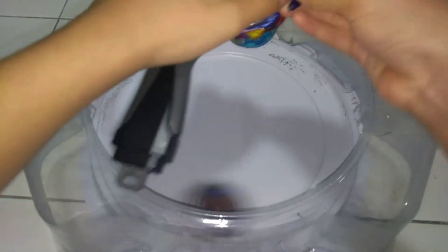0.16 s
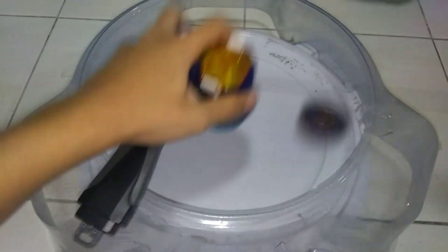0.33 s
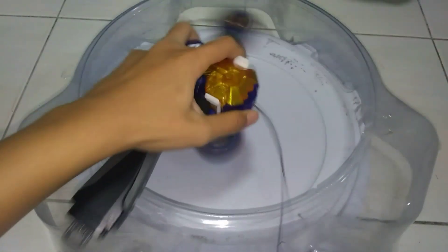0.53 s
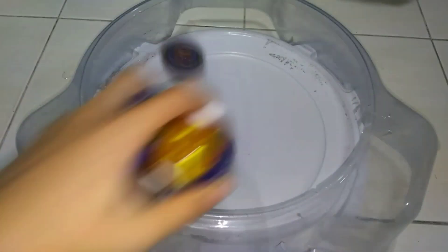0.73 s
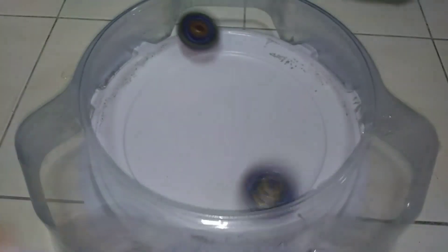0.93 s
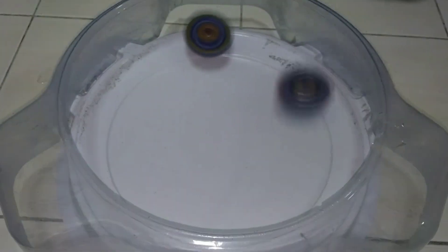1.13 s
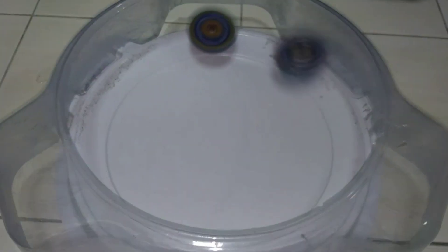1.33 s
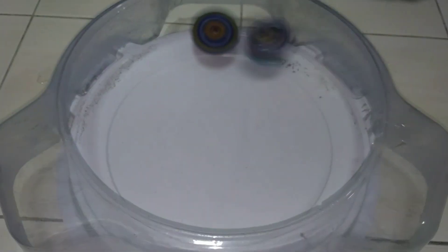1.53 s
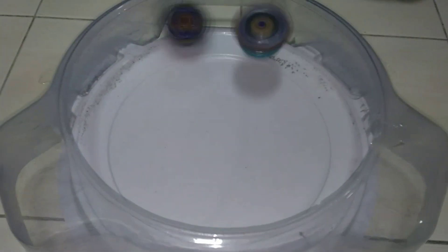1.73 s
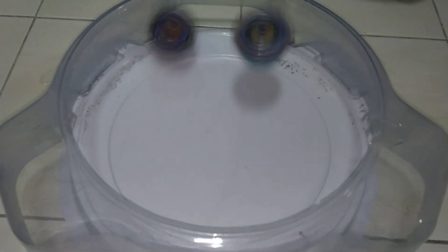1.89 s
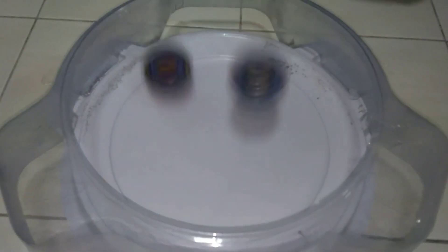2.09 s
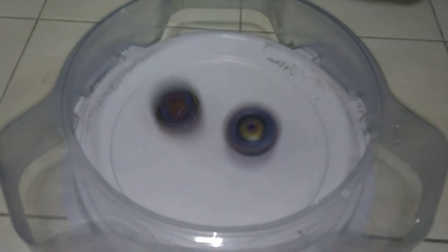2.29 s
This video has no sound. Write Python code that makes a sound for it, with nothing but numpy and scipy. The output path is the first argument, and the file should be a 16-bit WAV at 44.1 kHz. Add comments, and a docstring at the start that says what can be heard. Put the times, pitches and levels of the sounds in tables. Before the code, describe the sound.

Spinning toy tops clack and rattle in a plastic bowl. First come close launcher knocks and a quick whistling, rasping cord pull, then a dense run of sharp knocks, then duller clashes, in a tiled room with low microphone rumble.

```python
"""Plastic knocks and a whistling zip: a cord launcher is gripped, pulled and knocked about up close,
then two spinning tops clash and rattle in a plastic bowl. Each knock is a short chatter of contacts
that shakes hard rims, a hollow shell and the bowl's floor, with a bright metallic tick until the
treble shuts off midway. A tiled room answers, a low rumble comes and goes and the loudest blows clip."""
import sys
import numpy as np
from scipy import signal
from scipy.fft import rfft, irfft, next_fast_len
from scipy.io import wavfile
from scipy.ndimage import uniform_filter1d, map_coordinates

SR = 44100
rng = np.random.default_rng(int(sys.argv[2]) if len(sys.argv) > 2 else 0)


def pcm_store(signal):
    """Save signal as 16-bit PCM."""
    levels = np.round(np.clip(np.atleast_2d(signal), -1, 1) * 32767)
    wavfile.write(sys.argv[1], SR, levels.astype(np.int16).T)


N = 103635
CONTACT_ATTACK_S = .0004


def knocks():
    """Blows shake the plastic and the bowl, with a bright metallic tick until the treble shuts off."""
    # launcher and landing top: start_s, clack_db, bump_db, thud_db, tick_db, chatter_s, decay_stretch
    handling = [(0.001, -41, -29, -32, -74, 0.018, 1.57), (0.162, -51, -20.5, -38, -46, 0.015, 1.2),
                (0.177, -56, -33, -24.5, -32.5, 0.0053, 1.44),
                (0.215, -16, -26.5, -23.5, -20.5, 0.013, 1.7),
                (0.227, -12, -25.5, -12.5, -18.5, 0.0075, 1.75),
                (0.464, -26, -11.5, -17, -37, 0.0087, 0.78), (0.4995, -19, -31.5, -41.5, 3, 0.0018, 0.7),
                (0.513, -10, -25, -30, -17.5, 0.0033, 1.4), (0.518, -10.5, -11.5, -5.5, -10, 0.0029, 1.01),
                (0.557, -20, -30, -31, -13.5, 0.012, 3), (0.627, -33.5, -34, -32, -14, 0.002, 0.34),
                (0.633, -44.5, -12.5, -45, -4.5, 0.0014, 0.34), (0.647, -12, 1.5, -18.5, -3.5, 0.0039, 0.8),
                (0.665, -18, -21, -9.5, -4.5, 0.002, 0.47), (0.679, -23, -28, -15.5, -16, 0.0045, 0.83),
                (0.7, -10.5, -14, -13, -21, 0.0052, 1.2), (0.706, -13, -10.5, -8, -19, 0.012, 1.17),
                (0.752, -23, -16.5, -19, -17.5, 0.0031, 1.75), (0.81, -14, -28.5, -41, 3, 0.0069, 1.1),
                (0.852, -25, -18.5, -24.5, -22.5, 0.01, 1.22),
                (0.9328, -21, -21.5, -10.5, -23.5, 0.015, 1.06), (0.941, -18, -28, -14, -17.5, 0.01, 1.2),
                (0.964, 0, -15.5, -6.5, -12.5, 0.021, 0.84), (0.995, -15, -20, -12.5, -18.5, 0.017, 2.3),
                (1.045, -19.5, -19.5, -10.5, -20, 0.0081, 1.01),
                (1.117, -30, -16.5, -29, -21.5, 0.0035, 1.06),
                (1.124, -25.5, -17, -40, -18.5, 0.0089, 0.67), (1.198, -33, -42.5, -62, -16.5, 0.0052, 1.2)]
    # tops hit each other and the rim: start_s, clack_db, bump_db, thud_db, chatter_s, decay_stretch
    clashes = [(1.321, -38.5, -29, -40.5, 0.012, 0.98), (1.368, -31.5, -12, -35.5, 0.0042, 0.56),
               (1.445, -50, -25.5, -36.5, 0.0069, 1.34), (1.539, -18, -21, -16, 0.012, 0.97),
               (1.553, -24, -19, -16.5, 0.016, 1.2), (1.576, -24.5, -16, -16.5, 0.037, 1.35),
               (1.631, -27, -26, -22, 0.017, 3), (1.719, -27, -10.5, -20.5, 0.0059, 1.83),
               (1.7475, -6, -14, -22, 0.011, 1.06), (1.806, -7.5, -15, -18.5, 0.011, 0.84),
               (2.011, -31.5, -28.5, -28, 0.041, 1.6), (2.071, -27.5, -21, -26, 0.013, 4.3),
               (2.217, -32.5, -27.5, -36, 0.0066, 1.2)]
    blows = [row[:4] + row[5:] for row in handling] + list(clashes)
    clack = rim_clack([(s, db, *shape) for s, db, _, _, *shape in blows])
    thud = shell_thud([(s, db, *shape) for s, _, _, db, *shape in blows])
    tick = metal_tick([(s, db, *shape) for s, _, _, _, db, *shape in handling])
    bump = bowl_bump([(s, db, stretch) for s, _, db, _, _, stretch in blows])
    return clack + thud + tick + bump


def rim_clack(hits):
    """Hard plastic rims ring over broad contact noise."""
    # rim resonances: pitch_hz, width_hz, level_db
    rims = [(1650, 360, -10.5), (2065, 35, 8), (2470, 290, -3.5), (3266, 80, 5), (3304, 430, -1),
            (4417, 300, 2)]
    # contact noise between the resonances: frequency_hz, level_db
    contact = [(200, -32), (1500, -4.5), (4500, -4), (9000, -15)]
    return chatter(hits, lambda f: modes(rims, f) + amp(along(contact, f)), t60_s=.054, body_hz=1300)


def shell_thud(hits):
    """The hollow shell thuds, brighter or darker with the part that is struck."""
    # shell resonances: pitch_hz, width_hz, level_db
    shell = [(351, 142, 6.5), (491, 65, 9.5), (591, 126, 5), (858, 81, 15), (1016, 68, 12.5),
             (1224, 360, 6)]
    # brightness of the thud: time_s, upper_over_lower_modes_db
    tilt = [(.23, 3), (.53, 4.5), (.68, -4), (.86, -6), (.94, -4.5), (1.01, 4), (1.05, -6.5), (1.6, -6),
            (1.73, -10), (1.8, 6), (2.05, -4.5)]
    half_tilt_db = lambda s: np.interp(s, *np.transpose(tilt)) / 2
    low_hits = [(s, db - half_tilt_db(s), *shape) for s, db, *shape in hits]
    high_hits = [(s, db + half_tilt_db(s), *shape) for s, db, *shape in hits]
    low = chatter(low_hits, lambda f: modes(shell[:3], f), t60_s=.075, body_hz=503)
    high = chatter(high_hits, lambda f: modes(shell[3:], f), t60_s=.075, body_hz=900)
    return low + high


def metal_tick(hits):
    """Small metal parts tick brightly; one rings out twice."""
    # tick colour ahead of the low cut: frequency_hz, level_db
    colour = [(4000, 9.5), (6500, 6.5), (11800, 5.5), (15000, -0.5)]
    # the ringing part: start_s, level_db
    pings = [(.6355, -12), (.663, -20)]
    bright = lambda f: amp(along(colour, f)) / (1 + (5000 / (f + 1)) ** 4)
    ticks = chatter(hits, bright, t60_s=.018, body_hz=3000)
    ping_hz, ping_t60_s = 7100, .06
    return ticks + rings([(s, db, ping_hz, ping_t60_s) for s, db in pings], CONTACT_ATTACK_S)


def bowl_bump(hits):
    """The bowl's floor gives a low bump, tuned a little differently at every push."""
    # floor resonances: pitch_hz, level_db
    floor = [(135, -0.5), (192, 4.5), (300, 2.5)]
    # the floor flexes just before a snap: start_s, level_db
    flexes = [(0.14, -36), (0.8, -6), (1.108, -22), (1.186, -16)]
    pushes = hits + [(s, db, 1) for s, db in flexes]
    base_t60_s = .067
    partials = [(s, db + mode_db, hz * np.exp(.07 * rng.standard_normal()), base_t60_s * stretch)
                for s, db, stretch in pushes for hz, mode_db in floor]
    return rings(partials, attack_s=.0066)


def cord_whistle():
    """The cord whips out with a rough, fluttering whistle, chopped by the gear's teeth."""
    # the whistle's path: time_s, pitch_hz, level_db
    path = [(0.321, 8140, -30.5), (0.337, 8580, -27), (0.349, 8930, -15.5), (0.364, 9420, -10),
            (0.378, 8900, -10), (0.39, 8130, -14.5), (0.401, 8960, -30), (0.417, 8870, -13),
            (0.424, 8800, -17), (0.433, 8350, -15.5), (0.445, 8510, -33), (.465, 8300, -19),
            (.5, 8140, -31.5)]
    width_hz, teeth_hz, flutter_db = 150, 660, 3.5
    pitch_hz, level_db = curves(path)
    rough = filtered(rng.standard_normal((2, N)), lambda f: 1 / (1 + (f / width_hz) ** 2))
    phase = 2 * np.pi * np.cumsum(pitch_hz) / SR
    tone = (unit(rough[0]) + 1) * np.cos(phase) + unit(rough[1]) * np.sin(phase)
    teeth = 1 + .35 * np.cos(2 * np.pi * np.cumsum(teeth_hz * amp(wobble(60))) / SR)
    flutter = amp(flutter_db * wobble(180))
    return amp(level_db) * unit(teeth * flutter * tone)


def cord_rasp():
    """The cord drags through its gear with a swelling rasp."""
    # rasp resonances: pitch_hz, width_hz, level_db
    gear = [(2740, 190, 11), (3610, 1100, 0.5), (8500, 1300, 5)]
    # swell of the pull: time_s, level_db
    swell = [(.33, -42), (.36, -42), (.39, -29), (.44, -21), (.5, -17)]
    friction = rng.standard_normal(N) * amp(1.9 * wobble(150))
    rasp = filtered(friction, lambda f: modes(gear, f) / (1 + (1800 / (f + 1)) ** 3))
    return amp(curves(swell)[0]) * unit(rasp)


def spinning_tips():
    """Tips skate over the bowl: a grainy rattle."""
    # rise and fall of the rattle: time_s, level_db
    swell = [(0.0, -31), (0.12, -67), (0.42, -40), (.5, -16.5), (0.66, -30), (0.77, -23.5), (0.89, -29.5),
             (1.01, -28.5), (1.18, -38), (1.35, -41.5), (1.58, -37), (1.73, -24.5), (1.94, -23.5),
             (2.21, -35.5), (2.35, -41.5)]
    # rattle colour: frequency_hz, level_db
    colour = [(200, 4), (600, -4.5), (1500, -4), (3500, -4.5), (8000, -15), (15000, -12)]
    grains = rng.standard_normal(N) * amp(2.2 * wobble(250) + 1.2 * wobble(30))
    return amp(curves(swell)[0]) * unit(filtered(grains, lambda f: amp(along(colour, f))))


def tiled_room(x):
    """Each frequency dies at its own speed; every eighth of a second gets a fresh tail."""
    # reverb decay: frequency_hz, t60_s
    decay = [(200, 0.44), (700, 0.36), (2500, 0.29), (7000, 0.38), (14000, 0.29)]
    out, step, predelay_samples = np.zeros(N + SR), SR // 8, 200
    for i in range(0, N, step):
        hz, t, spectrum = signal.stft(rng.standard_normal(SR // 2), SR, nperseg=256)
        tail = signal.istft(spectrum * amp(-60 * t / along(decay, hz)[:, None]), SR, nperseg=256)[1]
        wet = signal.fftconvolve(x[i:i + step], tail / np.linalg.norm(tail))
        out[i + predelay_samples:][:len(wet)] += wet
    return out[:N]


def rumble():
    """A lumpy low rumble, like air buffeting the microphone."""
    # surges: time_s, level_db
    surges = [(0.0, -53.5), (0.09, -87), (0.18, -30), (0.29, -77), (0.31, -19.5), (0.38, -19.5),
              (0.46, -24.5), (0.54, -53), (0.61, -74), (0.65, -19.5), (0.71, -41), (0.8, -41), (0.94, -61),
              (0.97, -22.5), (1.3, -50.5), (1.34, -23), (1.38, -20), (1.42, -31), (1.53, -24),
              (1.56, -16.5), (1.75, -20.5), (1.77, -23), (1.98, -53.5), (2.04, -19.5), (2.31, -32),
              (2.35, -48.5)]
    # rumble colour: frequency_hz, level_db
    colour = [(25, -29), (55, -3.5), (110, 0), (230, -10), (450, -29.5)]
    with_skirts = [(4.1, -57), *colour, (1500, -77)]
    low = filtered(rng.standard_normal(N), lambda f: amp(along(with_skirts, f)))
    lumpy = levelled(low, span_samples=2600) * amp(1.3 * wobble(40))
    return amp(curves(surges)[0]) * unit(lumpy)


def chatter(hits, response, t60_s, body_hz):
    """Uneven contacts keep a body sounding, then it decays: start_s, level_db, chatter_s, stretch."""
    t, power = np.arange(N) / SR, np.zeros(N)
    for start_s, db, chatter_s, stretch in hits:
        age = np.maximum(t - start_s, 0)
        attack = 1 - np.exp(-age / CONTACT_ATTACK_S)
        decay_db = 60 * np.maximum(age - chatter_s, 0) / (t60_s * stretch)
        power += (attack * amp(db - decay_db)) ** 2
    noise = filtered(rng.standard_normal(N), response)
    even = levelled(noise, span_samples=int(6.6 / body_hz * SR))  # over 6.6 cycles of the body
    spikes = amp(1.6 * wobble(400))
    return np.sqrt(power) * unit(even * spikes)


def rings(partials, attack_s):
    """Damped sines: start_s, level_db, pitch_hz, t60_s."""
    out, age = np.zeros(N + SR), np.arange(SR // 4) / SR
    attack = 1 - np.exp(-age / attack_s)
    for start_s, db, hz, t60_s in partials:
        ring = attack * amp(db - 60 * age / t60_s) * np.sin(2 * np.pi * hz * age)
        out[round(start_s * SR):][:len(age)] += ring
    return out[:N]


def modes(table, f):
    """Response of a set of resonances, alternating in polarity."""
    return sum((-1) ** k * amp(db) * 1j * f * width / (hz * hz - f * f + 1j * f * width)
               for k, (hz, width, db) in enumerate(table))


def filtered(x, response):
    """Shape x with a frequency response."""
    size = next_fast_len(N + SR // 2)
    return irfft(rfft(x, size) * response(np.fft.rfftfreq(size, 1 / SR)), size)[..., :N]


def levelled(x, span_samples):
    """Even out x by its running RMS."""
    return x / np.sqrt(np.abs(uniform_filter1d(x ** 2, size=span_samples)) + 1e-12)


def wobble(rate_hz):
    """A smooth random curve."""
    knots = rng.standard_normal(int(N * rate_hz / SR) + 4)
    return map_coordinates(knots, [np.arange(N) * rate_hz / SR])


def curves(rows):
    """One value per sample for each column after the time."""
    time_s, *columns = np.transpose(rows)
    return [np.interp(np.arange(N) / SR, time_s, column) for column in columns]


def along(points, hz):
    """Interpolate on a log frequency axis."""
    f, values = np.transpose(points)
    return np.interp(np.log(hz + 1), np.log(f + 1), values)


def amp(db):
    return 10 ** (np.asarray(db) / 20)


def unit(x):
    return x / np.sqrt(np.mean(x ** 2) + 1e-20)


def scene():
    """Knocks and one cord pull sound in the room, over a dry rattle and rumble."""
    t = np.arange(N) / SR
    pull_start_s, pull_end_s, fade_s = .321, .5, .006
    pull_gate = np.clip(np.minimum(t - pull_start_s, pull_end_s - t) / fade_s, 0, 1)
    direct = knocks() + pull_gate * (cord_whistle() + cord_rasp())
    return (direct + amp(-8) * tiled_room(direct) + spinning_tips() + rumble())[None]


def record(dry):
    """The treble shuts off midway, loud blows clip and a faint hiss lies underneath."""
    dull_from_s, dull_hz, bright_hz, limit_hz = 1.229, 4700, 15700, 16700
    clip_hardness = 40
    bright = filtered(dry, lambda f: f < bright_hz)
    dull = filtered(dry, lambda f: 1 / (1 + (f / dull_hz) ** 90))
    x = np.where(np.arange(N) < dull_from_s * SR, bright, dull)
    clipped = x / (1 + np.abs(x) ** clip_hardness) ** (1 / clip_hardness)
    hiss = amp(-71) * filtered(rng.standard_normal(N), lambda f: f < bright_hz)
    return filtered(clipped + hiss, lambda f: f < limit_hz)


dry = scene()
out = record(dry)
pcm_store(out)
```